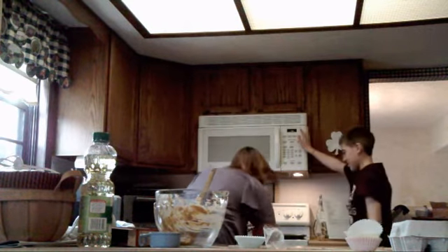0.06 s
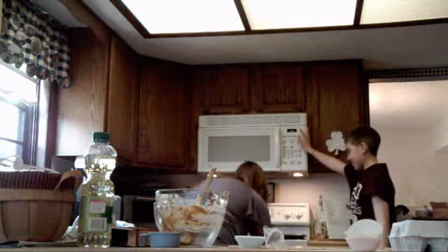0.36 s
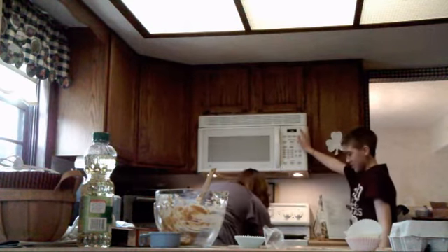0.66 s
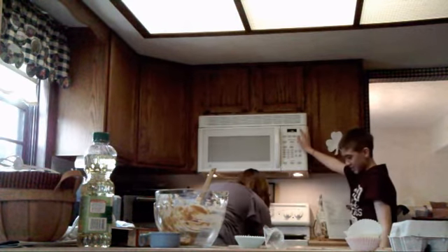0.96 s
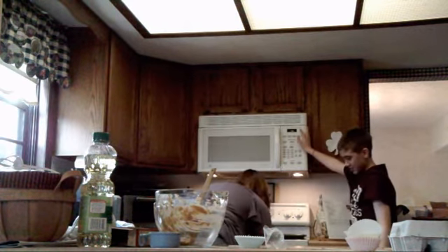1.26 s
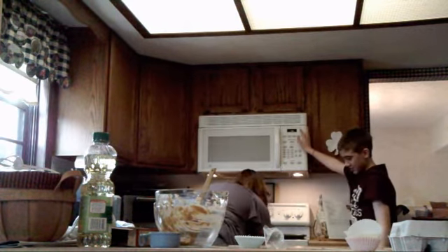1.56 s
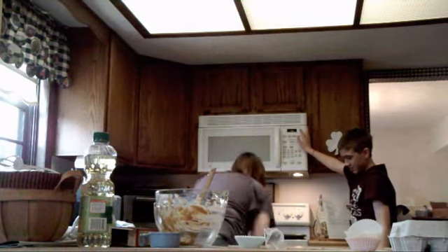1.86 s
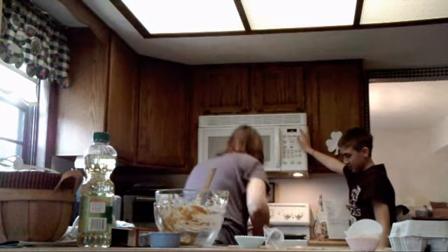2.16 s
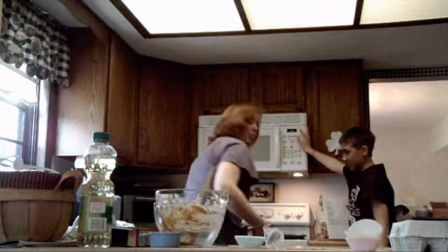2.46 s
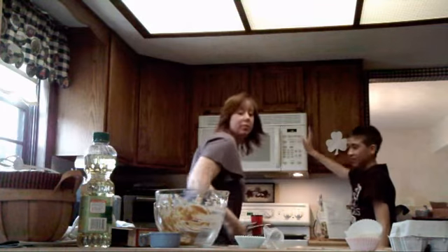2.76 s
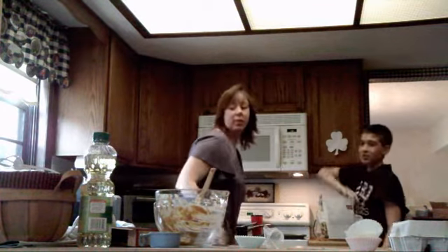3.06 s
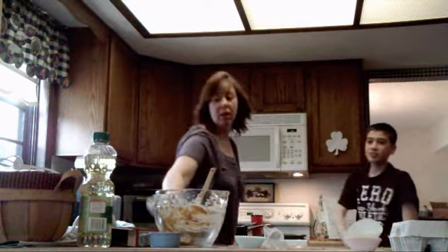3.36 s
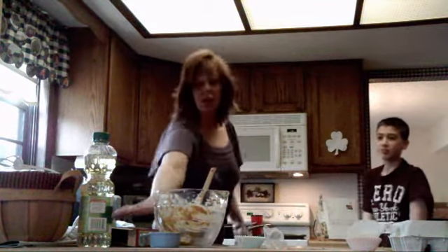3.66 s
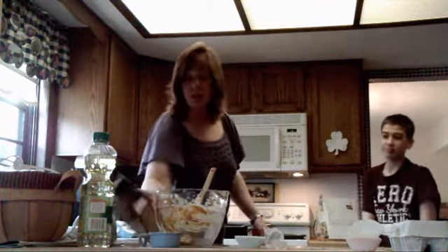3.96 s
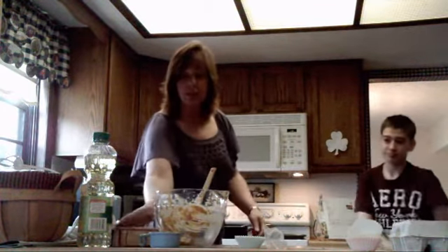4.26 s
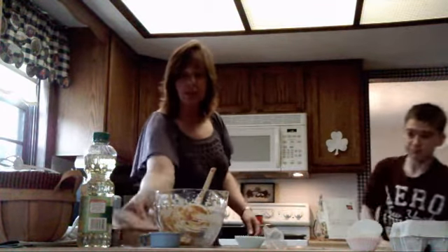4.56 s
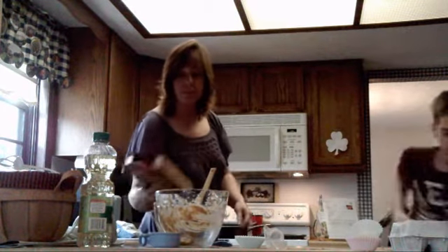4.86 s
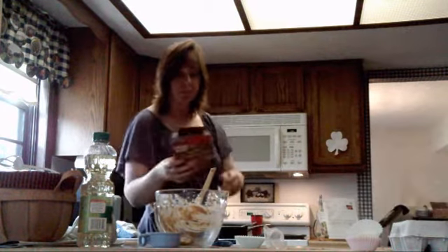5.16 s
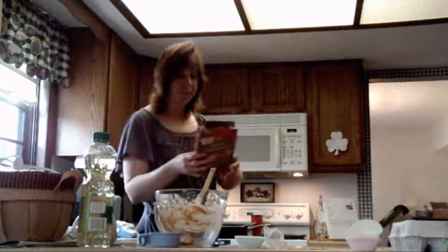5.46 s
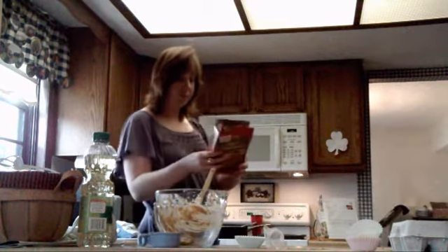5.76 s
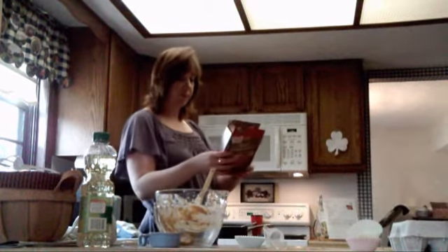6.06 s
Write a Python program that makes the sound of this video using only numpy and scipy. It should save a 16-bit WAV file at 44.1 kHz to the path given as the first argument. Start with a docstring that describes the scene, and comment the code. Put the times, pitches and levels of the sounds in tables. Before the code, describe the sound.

A quiet appliance hum and faint hiss fill a home kitchen, heard from the counter beside a glass mixing bowl. From about 0.5 seconds someone rummages in a wooden cupboard across the room, with light knocks, rubbing, a short slide and a faint jar tinkle. Soft bumps follow after 2.2 seconds, then a tiny hinge squeak at 2.6 and a brief crinkle of a stiff packet around 2.8. Near 4 seconds two cupboard doors bang shut in quick succession. From about 4.4 seconds footsteps approach, growing into low thuds that shake the counter. At 5.5 and 5.8 seconds things are put down close by, making the filled bowl and its wooden spoon clatter loudly and dully, the second time with sharp glass clinks. A deep, heavy thump shakes the counter at about 6.1 seconds.

```python
"""Kitchen cupboard and mixing bowl

Heard from the counter, beside a glass mixing bowl. Someone rummages in a far cupboard, pulls out a
packet, bangs the doors shut and walks up; things are put down, so bowl and wooden spoon clatter.
Each hit rings a body's dying modes into the room, and steps shake the counter. Appliances hum throughout."""
import sys
import numpy as np
from scipy import signal
from scipy.fft import rfft, irfft
from scipy.io import wavfile
from scipy.ndimage import uniform_filter1d

SR = 44100
rng = np.random.default_rng(int(sys.argv[2]) if len(sys.argv) > 2 else 0)


def dump_mix(stems):
    """Bounce the given channels to the path in sys.argv[1] as a 16-bit WAV at rate SR."""
    frames = np.atleast_2d(stems).T  # one column per channel
    limited = np.clip(frames, -1, 1)  # hard clip at full scale
    pcm = np.round(limited * 32767).astype(np.int16)
    wavfile.write(sys.argv[1], SR, pcm)


N = 269966
NOW = np.arange(N) / SR  # scene time/s
T = np.arange(int(.7 * SR)) / SR  # time within one hit/s


def amp(db):
    """Decibels to gain."""
    return 10 ** (np.asarray(db) / 20)


def unit_rms(x):
    """Scales to an rms of 1."""
    return x / np.sqrt(np.mean(x ** 2) + 1e-20)


def unit_hit(x):
    """Scales so that the loudest 10 ms have an rms of 1."""
    return x / np.sqrt(uniform_filter1d(x ** 2, 441, mode="constant").max() + 1e-20)


def curve_at(points, hz):
    """Reads a curve on a log-frequency axis."""
    f, value = np.transpose(points)
    return np.interp(np.log(hz + 1), np.log(f + 1), value)


def add(mix, s, sound):
    """Lays a sound into the mix at time s."""
    part = mix[round(s * SR):][:len(sound)]
    part += sound[:len(part)]


def wander(rate_hz):
    """Slow random drift with an rms of 1."""
    lowpass = np.exp(-(np.fft.rfftfreq(N, 1 / SR) / rate_hz) ** 2)
    return unit_rms(irfft(rfft(rng.standard_normal(N)) * lowpass, N))


def attack(rise_s):
    """A blow builds up as surfaces settle against each other."""
    return 1 - np.exp(-T / rise_s)


def spell(start, end, fade_s):
    """An envelope that fades in, holds and fades out."""
    return np.clip(np.minimum(NOW - start, end - NOW) / fade_s, 0, 1)


def ring(modes):
    """A struck body: dying sines of alternating polarity, from rows of f/Hz, level/dB, t60/s."""
    return sum((-1) ** k * amp(db - 60 * T / t60) * np.sin(2 * np.pi * hz * T)
               for k, (hz, db, t60) in enumerate(modes))


def contacts(per_s, spread_db):
    """A random train of small contacts of uneven size."""
    clicks = (rng.random(N) < per_s / SR) * rng.choice([-1., 1.], N)
    return clicks * amp(spread_db * np.minimum(rng.exponential(1, N), 4))


def contact_eq(x, bass_db, treble_db):
    """Sets bass and treble against the mids: heavy blows boom, hard ones are bright, soft ones muffled."""
    mid_top_hz = np.clip(2100 * amp(0.39 * (treble_db + 11)), 950, 2500)
    bands = [(bass_db, (130, 420), "bandpass"), (0, (480, mid_top_hz), "bandpass"),
             (treble_db, 2000, "highpass")]
    return sum(amp(db) * unit_hit(signal.sosfilt(signal.butter(3, hz, kind, fs=SR, output="sos"), x))
               for db, hz, kind in bands)


# kitchen reverb time: f/Hz, t60/s
ROOM_DECAY = [(100, 0.52), (400, 0.36), (1000, 0.44), (3000, 0.35), (8000, 0.36)]


def in_room(x, wet_db, early_db, early_s):
    """Direct sound, early reflections off counter and cupboards, then the kitchen's tail."""
    taps = rng.choice([-1., 1.], len(T)) * (rng.random(len(T)) < 5000 / SR)
    hz, t, spectrum = signal.stft(taps, SR, nperseg=256)
    decay = amp(-60 * t / curve_at(ROOM_DECAY, hz)[:, None])
    tail = signal.istft(spectrum * decay, SR, nperseg=256)[1][:len(T)]
    tail *= (1 + amp(early_db) * np.exp(-T / early_s)) * attack(rise_s=0.001)
    response = amp(wet_db) * tail / np.linalg.norm(tail)
    response[0] += 1  # direct sound
    return signal.fftconvolve(x, response)[:len(x)]


# spells of motor drone: start/s, end/s, f/Hz, level/dB
DRONES = [(-0.35, 2.95, 77.4, -42), (3.501, 5.8, 72.5, -46)]
# steady appliance tones: f/Hz, level/dB before trim
HUM_TONES = [(183.0, -58.5), (242.2, -54.5), (290.7, -89), (393.0, -54.5), (484.5, -61.5), (882.9, -69.5)]


def appliances():
    """A motor's low drone comes and goes under thin, wavering tones."""
    def waver(hz, db, drift_db, drift_hz, wobble_rad, wobble_hz):
        phase = 2 * np.pi * hz * NOW + wobble_rad * wander(wobble_hz)
        return amp(db + drift_db * wander(drift_hz)) * unit_rms(np.sin(phase))

    drone = sum(spell(start, end, fade_s=1.08) * waver(hz, db, 0.77, 4.5, 0.3, 1.5)
                for start, end, hz, db in DRONES)
    return drone + sum(waver(hz, db - 1, 0.46, 1.6, 0.58, 2.5) for hz, db in HUM_TONES)


# colour of the noise bed: f/Hz, relative density/dB
AIR_SPECTRUM = [(29, -44.5), (50, -6.5), (54, -25), (87, -18), (163, -23), (239, -18.5), (335, -25),
                (388, -23.5), (441, -25), (500, -25.5), (645, -28), (885, -32), (2150, -36.5), (4230, -37),
                (7800, -42), (10100, -67), (17200, -120)]


def room_tone():
    """An even bed of room air and microphone hiss."""
    colour = amp(curve_at(AIR_SPECTRUM, np.fft.rfftfreq(N, 1 / SR)))
    return amp(-47) * unit_rms(irfft(rfft(rng.standard_normal(N)) * colour, N))


# the cupboard's wooden body: f/Hz, relative level/dB, t60/s
WOOD_MODES = [(156, -7.5, 0.047), (262.3, -7.5, 0.044), (393, -2.5, 0.042), (537, -5, 0.037),
              (658, -3, 0.026), (823, 0, 0.017), (978, 0, 0.011), (1373, -4, 0.015), (1635, -6.5, 0.01),
              (2290, -14, 0.0079), (2930, -14, 0.0062), (3320, -14, 0.011), (4140, -13.5, 0.0064),
              (5630, -14.5, 0.0041), (7900, -5.5, 0.00061)]


def cupboard(bass_db, treble_db, rise_s):
    """The far cupboard answers a contact, each from another spot, mostly through the room."""
    wood = in_room(ring(WOOD_MODES), wet_db=1, early_db=4, early_s=0.12)
    return contact_eq(wood * attack(rise_s), bass_db, treble_db)


def struck_piece(modes, rise_s):
    """The struck thing's own ring, from across the room."""
    return unit_hit(in_room(ring(modes), wet_db=-1.5, early_db=-14.5, early_s=.02) * attack(rise_s))


# knocks on wood, from rummaging and the taps of footsteps:
# t/s, level/dB, hardness/dB, note f/Hz, note re level/dB
KNOCKS = [(0.465, -37.5, 1.5, 556, 7), (0.651, -31.5, -1, 1040, -5), (0.688, -35, -8, 555, 1),
          (0.702, -34.5, 4, 760, -1.5), (0.738, -39, -1, 1336, -13), (1.224, -37, 6.5, 1023, -4.5),
          (1.272, -30, 3.5, 1073, -1.5), (1.287, -35.5, 1, 1496, -5.5), (1.316, -42, -8, 1400, -7),
          (1.423, -41.5, 5, 897, -4), (2.204, -43.5, -4.5, 506, -12), (2.377, -49.5, -7, 486, 9),
          (2.537, -36, 3, 656, -4.5), (4.428, -33, -13.5, 514, -6), (4.664, -35, -11, 789, -4),
          (4.816, -43.5, -8.5, 597, -6.5), (4.980, -38.5, 1, 383, 3.5), (5.279, -40.5, -15, 813, -8.5),
          (6.078, -42.5, -6, 506, -3)]


def knocks(rise_s=0.0039, note_cycles=45):
    """Things knock on wood: harder contacts trade bass for treble, and small pieces die away first."""
    out = np.zeros(N)
    for s, db, hard_db, hz, note_db in KNOCKS:
        t60 = note_cycles / hz
        note = struck_piece([(hz, 0, t60), (1.55 * hz, -10, t60)], rise_s)
        wood = cupboard(bass_db=-13 - hard_db, treble_db=-13 + hard_db, rise_s=rise_s)
        add(out, s, amp(db) * (wood + amp(note_db) * note))
    return out


# spells of fumbling: start/s, end/s, level/dB before trim
RUBS = [(0.5, 1.844, -51.5), (2.259, 3.0, -50), (3.558, 4.5, -50), (4.697, 6.295, -46.5)]


def fumbling(floor_db=-65.5):
    """Tiny contacts on wood blur into rubbing, with faint stirring between the spells."""
    grain = signal.fftconvolve(contacts(per_s=150, spread_db=0.5), ring(WOOD_MODES))[:N]
    rub = unit_rms(contact_eq(grain, bass_db=6.5, treble_db=-6.5))
    spells = sum(amp(db - 1) * spell(start, end, fade_s=0.12) for start, end, db in RUBS)
    return in_room(rub * np.maximum(spells, amp(floor_db)), wet_db=1, early_db=6, early_s=0.017)


# shoves along a shelf: t/s, level/dB, treble re level/dB
SLIDES = [(1.501, -34, -7), (3.802, -34.5, -21.5), (3.971, -26, -10.5)]


def slides():
    """Things sliding on a shelf sound the cupboard with a soft attack."""
    out = np.zeros(N)
    for s, db, treble_db in SLIDES:
        add(out, s, amp(db) * cupboard(bass_db=-9, treble_db=treble_db, rise_s=0.017))
    return out


# the jar's ring: f/Hz, relative level/dB, t60/s
JAR_MODES = [(2440, -2, 0.011), (3000, -10, 0.0098), (3330, 3.5, 0.013), (4080, -14.5, 0.014),
             (4200, -1, 0.01), (6600, -1.5, .006)]
# nudges to the jar: t/s, level/dB before trim
TINKLES = [(1.516, -50), (1.548, -51), (2.435, -50), (2.778, -46), (2.845, -44.5), (2.894, -50.5),
           (3.887, -42), (4.058, -40)]


def jar():
    """A nudged jar tinkles faintly in the cupboard."""
    out = np.zeros(N)
    for s, db in TINKLES:
        tinkle = in_room(ring(JAR_MODES), wet_db=0.5, early_db=-4.5, early_s=0.007)
        add(out, s, amp(db + 3) * unit_hit(tinkle))
    return out


# the counter's sub-bass shudder: f/Hz, relative level/dB, t60/s
SHUDDER_MODES = [(27.6, -8, 0.93), (43.7, 10.5, 0.34)]
# a thud's body: multiple of its pitch, relative level/dB, t60/s
THUD_MODES = [(.6, -6, 0.075), (.82, -4, 0.065), (1, -1.5, 0.066), (1.3, -8.5, 0.064), (1.7, -11, 0.06),
              (2.4, -19.5, 0.05), (4.8, -24, 0.022)]
# footfalls and bumps: t/s, level/dB before trim, f/Hz
THUMPS = [(2.203, -33.5, 149), (2.378, -28.5, 153), (2.767, -48, 80), (2.812, -29.5, 219),
          (2.941, -24, 305), (4.343, -42.5, 106), (4.801, -17, 130), (5.161, -16, 160), (5.457, -8.5, 150),
          (5.782, -13, 115), (6.11, -5.5, 110.2)]


def thumps(shake_db_per_octave=29, pivot_hz=109.8):
    """Steps and bumps thud through the counter; lower, heavier ones make it shudder more."""
    out = np.zeros(N)
    shudder = unit_hit(ring(SHUDDER_MODES) * attack(rise_s=0.018))
    for s, db, hz in THUMPS:
        body = ring([(ratio * hz, mode_db, t60) for ratio, mode_db, t60 in THUD_MODES])
        thud = unit_hit(in_room(body, wet_db=6, early_db=7.5, early_s=0.043))
        shudder_db = db + 3.5 + shake_db_per_octave * np.log2(pivot_hz / hz)
        add(out, s, amp(shudder_db) * shudder + amp(db - 5) * thud)
    return out


def hinge():
    """One soft hinge squeak, bending slightly upward."""
    out, t = np.zeros(N), T[T < .09]
    squeak = signal.windows.tukey(len(t), .5) * np.sin(2 * np.pi * (560 * t + 110 * t ** 2))
    add(out, 2.615, amp(-46) * squeak)
    return in_room(out, wet_db=1, early_db=6, early_s=0.017)


# the packet's stiff skin: f/Hz, relative level/dB, t60/s
PACKET_MODES = [(203, -9, 0.041), (307, -9.5, 0.055), (472, -3.5, 0.017), (710, -5, 0.015),
                (910, -3.5, 0.011), (1460, -6, 0.0064), (3330, -10.5, 0.013), (3830, -7, 0.0056),
                (4250, -5, 0.0046), (5470, -8.5, 0.0034), (7200, -1, 0.0009)]
# packet scuffs, before trims: t/s, level/dB, bass re level/dB, treble re level/dB
SCUFFS = [(2.775, -31.5, -6, -0.5), (2.811, -28, -3.5, -4), (2.839, -30, -8, -11), (2.892, -32, -17, 0.5),
          (2.924, -31.5, 1, -5.5), (2.944, -32, 2, -11.5)]


def packet():
    """Each scuff is a dying clump of small snaps in a stiff packet."""
    out, skin = np.zeros(N), ring(PACKET_MODES)
    for s, db, bass_db, treble_db in SCUFFS:
        snaps = contacts(per_s=1800, spread_db=2.5)[:len(T)] * np.exp(-T / 0.012)
        crinkle = signal.fftconvolve(snaps, skin)[:len(T)]
        scuff = in_room(crinkle, wet_db=3.5, early_db=-11, early_s=0.029)
        add(out, s, amp(db - 5) * contact_eq(scuff, bass_db + 0.5, treble_db))
    return out


# a door panel's ring: f/Hz, relative level/dB, t60/s
DOOR_MODES = [(161, -12, 0.1), (260.4, -3.5, 0.15), (401.5, 2, 0.14), (536, 6, 0.045)]
# door hits: t/s, level/dB, treble re level/dB, panel re level/dB
BANGS = [(3.884, -26.5, -7, -7), (3.912, -19, -21.5, 0.5), (4.053, -23, -6.5, 3.5),
         (4.064, -19, -21.5, 1.5), (4.081, -34, -26.5, 9.5)]


def doors(rise_s=0.0052):
    """Two doors touch their catches, slam home and rebound, ringing cupboard and panel."""
    out = np.zeros(N)
    for s, db, treble_db, panel_db in BANGS:
        wood = cupboard(bass_db=-3.5, treble_db=treble_db, rise_s=rise_s)
        add(out, s, amp(db) * (wood + amp(panel_db) * struck_piece(DOOR_MODES, rise_s)))
    return out


# the filled bowl's damped body: f/Hz, relative level/dB, t60/s
BOWL_MODES = [(181, -24, 0.042), (290, 4, 0.032), (415, 5.5, 0.011), (574, 2, 0.018), (820, 3, 0.013),
              (1006, 3.5, 0.0052), (1333, -6.5, 0.0074), (2150, -32, 0.0037), (3360, -31.5, 0.0053),
              (4050, -34, 0.0064), (6350, -19.5, 0.00076)]
# hits on counter and bowl: t/s, level/dB before trim, bass re level/dB, treble re level/dB
CLATTER = [(5.4645, -14.5, -2, -6), (5.469, -15, -10, -5), (5.479, -16, -1, -2), (5.4905, -16, 0, -20),
           (5.509, -19, -1.5, -4), (5.788, -19.5, -15, -15), (5.8055, -14, -9, -12),
           (5.824, -8, -15, -10.5)]


def bowl_clatter():
    """Close, dull clatter of the filled bowl and its spoon as things are put down."""
    out, body = np.zeros(N), ring(BOWL_MODES)
    for s, db, bass_db, treble_db in CLATTER:
        wet_db = -20 - 1.37 * db  # louder blows land nearer, so they are drier
        blow = in_room(body, wet_db, early_db=10, early_s=0.014) * attack(rise_s=0.00041)
        add(out, s, amp(db - 4.5) * contact_eq(blow, bass_db, treble_db))
    return out


# clinks and ticks at the bowl: t/s, dry level/dB, f/Hz
CLINKS = [(5.8378, -19, 2470), (5.838, -25.5, 1390), (5.8593, -15, 4250), (5.861, -20.5, 6930),
          (5.871, -29.5, 1430), (5.917, -29, 1330), (5.967, -37, 1340)]


def bowl_clinks(ring_cycles=27):
    """Sharp contacts at the glass, each a single fast-dying mode."""
    out = np.zeros(N)
    for s, db, hz in CLINKS:
        add(out, s, ring([(hz, db, ring_cycles / hz)]))
    return in_room(out, wet_db=-8, early_db=28, early_s=0.0033)


def scene():
    """All layers in one mono mix."""
    return (appliances() + room_tone() + knocks() + fumbling() + slides() + jar() + thumps()
            + hinge() + packet() + doors() + bowl_clatter() + bowl_clinks())[None]


def record(dry, ceiling=.62, cutoff_hz=8000, dc_offset=.289):
    """Soft-clips the highest peaks, cuts the top end and adds a constant offset."""
    rounded = dry / (1 + (dry / ceiling) ** 6) ** (1 / 6)
    lowpass = signal.firwin(401, cutoff_hz, window=("kaiser", 9), fs=SR)
    return dc_offset + signal.oaconvolve(rounded, lowpass[None], "same")


dry = scene()
out = record(dry)
dump_mix(out)
```